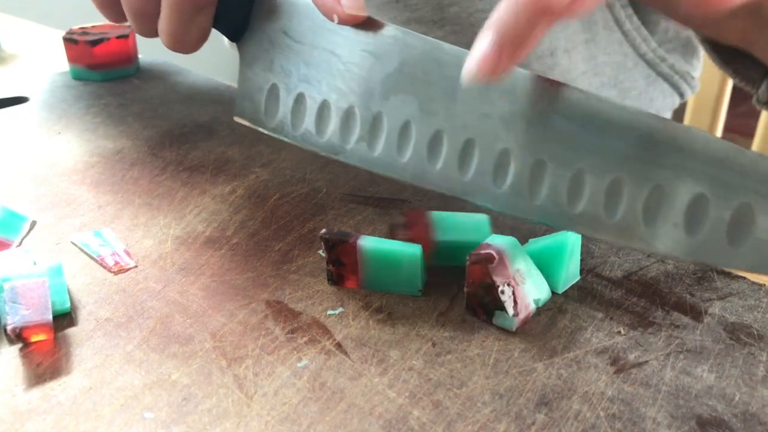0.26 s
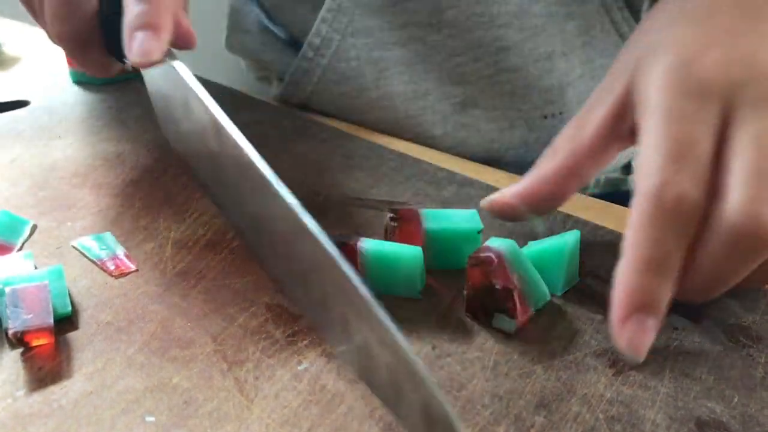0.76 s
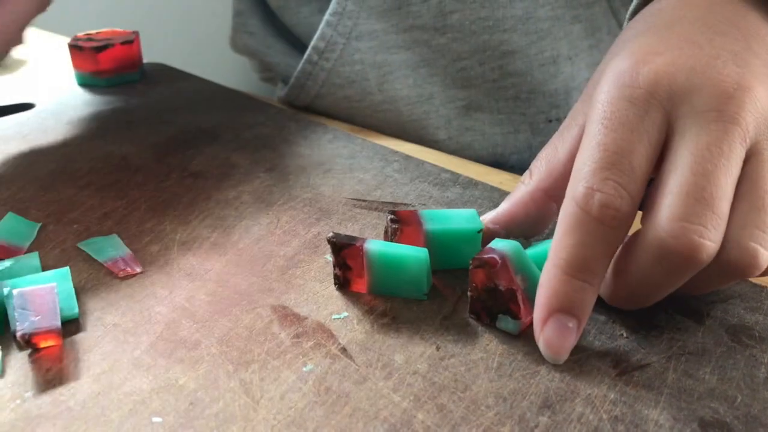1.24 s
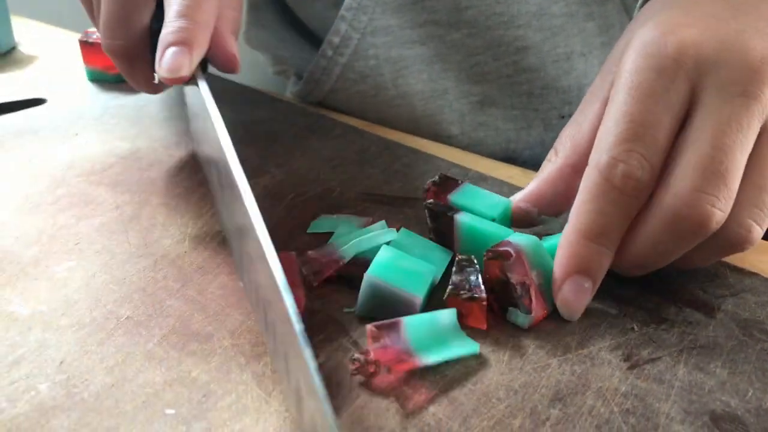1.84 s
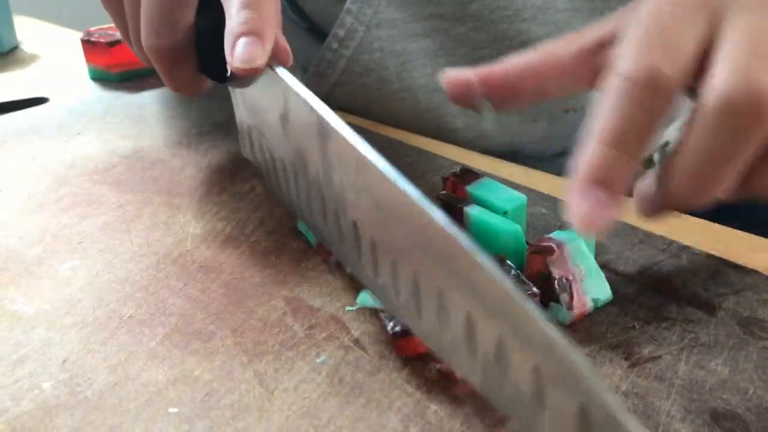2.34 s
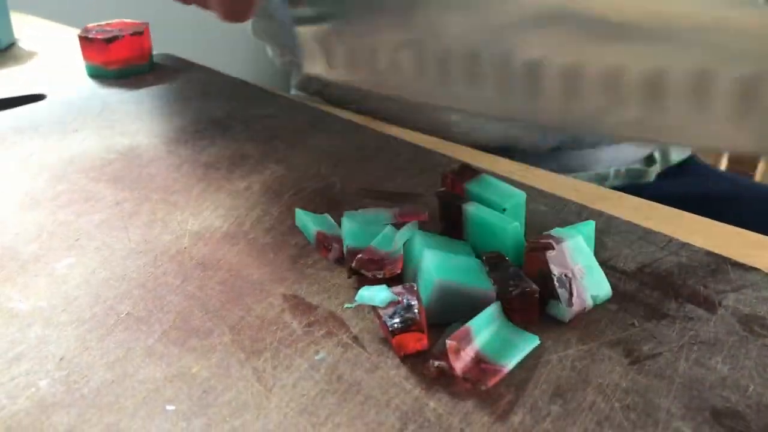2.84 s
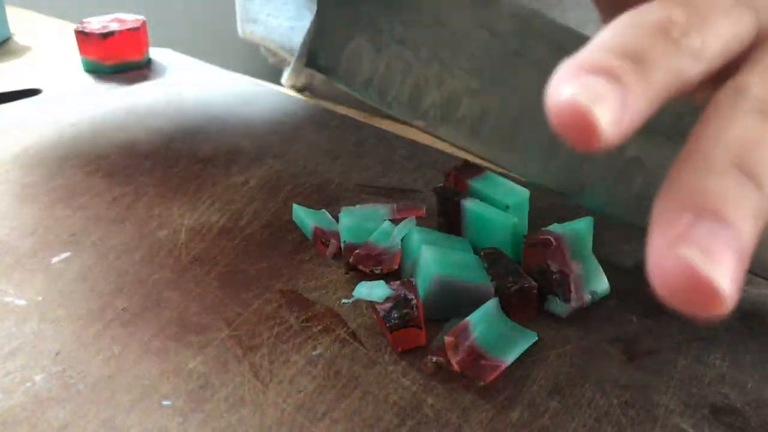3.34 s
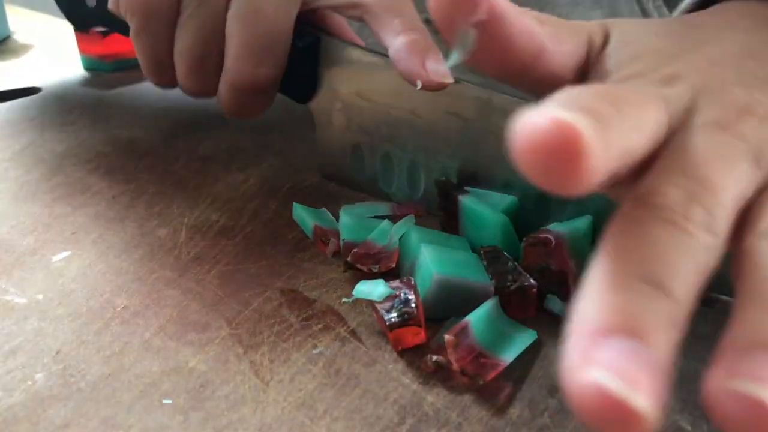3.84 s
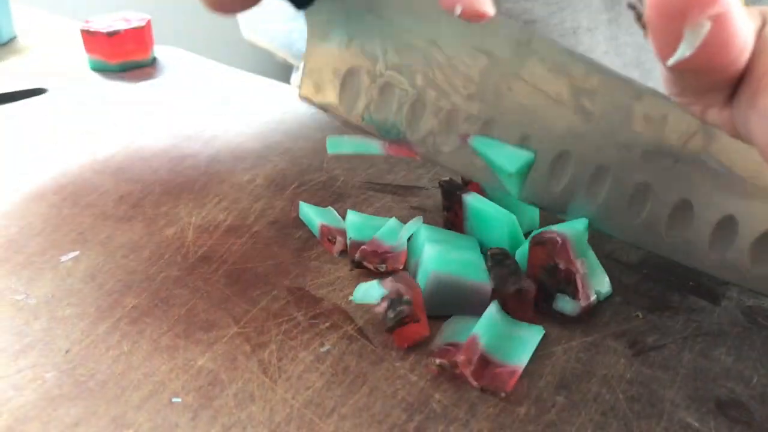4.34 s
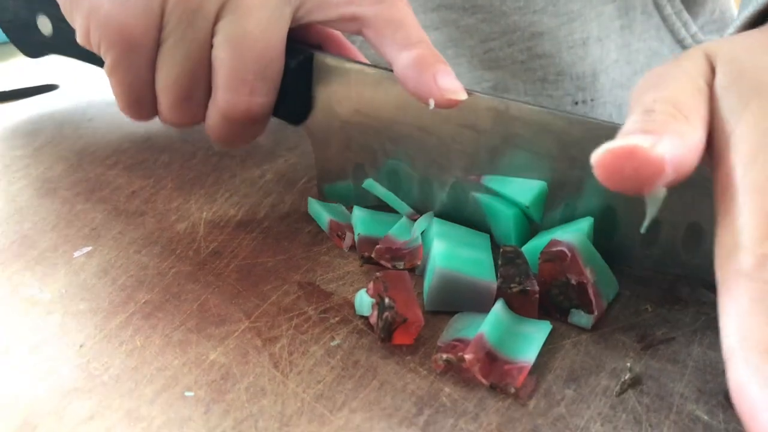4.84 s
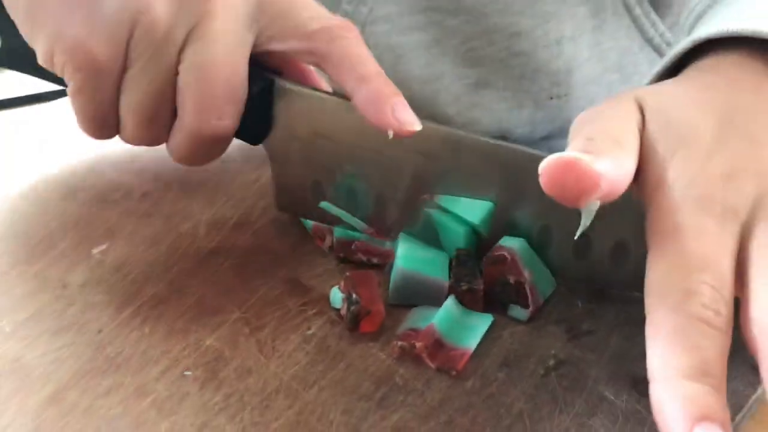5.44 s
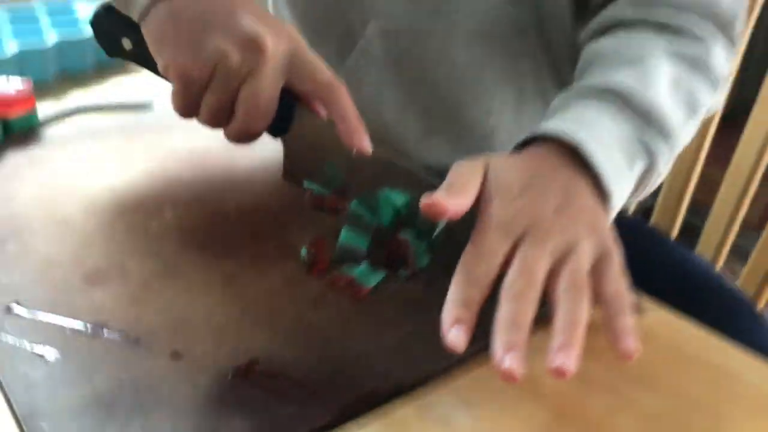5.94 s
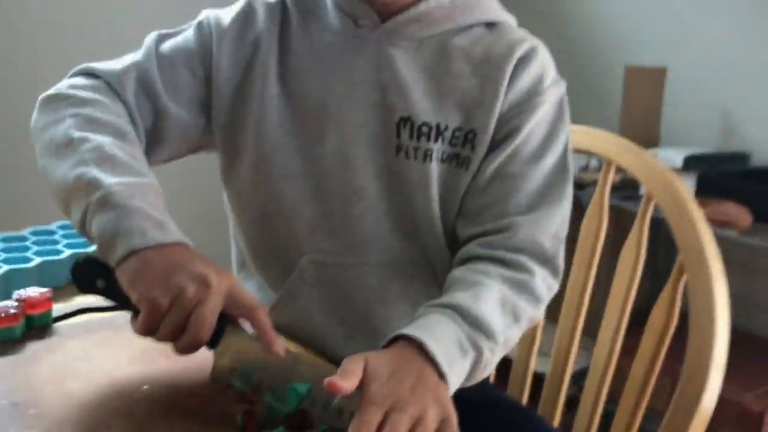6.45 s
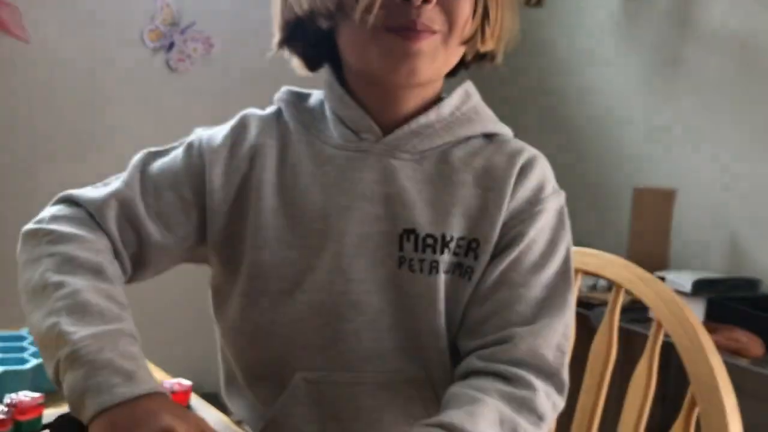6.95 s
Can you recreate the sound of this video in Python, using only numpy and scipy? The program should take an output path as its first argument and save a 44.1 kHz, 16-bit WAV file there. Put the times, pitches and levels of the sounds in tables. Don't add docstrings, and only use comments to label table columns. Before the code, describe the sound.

A large steel knife cracks irregularly onto a wooden board, scraping and ringing between blows as sticky soap snaps loose and sleeves rustle.

```python
import sys
import numpy as np
from scipy import signal
from scipy.fft import rfft, irfft
from scipy.io import wavfile

SR = 44100
rng = np.random.default_rng(int(sys.argv[2]) if len(sys.argv) > 2 else 0)


def to_wav(sig):
    pcm = np.clip(np.atleast_2d(sig), -1, 1) * 32767
    pcm = np.round(pcm).astype(np.int16)
    wavfile.write(sys.argv[1], SR, pcm.T)


def how_loud(loudness_db):
    steps = np.asarray(loudness_db, float) / 20
    return 10 ** steps


N = 316986


def rms_one(x):
    return x / np.sqrt(np.mean(x ** 2) + 1e-20)


def filtered(x, order, hz, kind="low"):
    return signal.sosfilt(signal.butter(order, hz, kind, fs=SR, output="sos"), x)


def at_hz(points, hz):
    at, *columns = np.transpose(points)
    return [np.interp(np.log(hz), np.log(at), column) for column in columns]


def colour(x, spectrum):
    hz = np.maximum(np.arange(N // 2 + 1) * SR / N, 1)
    return rms_one(irfft(rfft(x) * how_loud(at_hz(spectrum, hz)[0]), N))


def resonate(x, hz, width):
    r = np.exp(-np.pi * max(width, 3) / SR)
    poles = [1, -2 * r * np.cos(2 * np.pi * hz / SR), r * r]
    return signal.lfilter([1, 0, -1], poles, x) * (1 - r * r) / 2


def drift(rate):
    knots_per_s = 200
    knots = rng.standard_normal(int(N / SR * knots_per_s) + 2)
    slow = signal.sosfilt(signal.butter(2, min(rate, 90), fs=knots_per_s, output="sos"), knots)
    return np.interp(np.arange(N) / SR * knots_per_s, np.arange(len(slow)), rms_one(slow))


def grains(per_s, spread_db):
    sizes = how_loud(spread_db * np.minimum(rng.exponential(1, N), 3)) * rng.choice([-1, 1], N)
    return rms_one(sizes * (rng.random(N) < per_s / SR))


def swells(rows, weights=1):
    s, db, rise, fall = np.transpose(rows)[:4, :, None]
    at = np.arange(0, N + 32, 32)
    late = at / SR - s
    away = np.maximum(-late / np.maximum(rise, .002), late / np.maximum(fall, .002))
    gain = how_loud(db - 30 * (away + 4 * np.maximum(away - 1, 0)))
    return np.interp(np.arange(N), at, np.sum(gain * np.reshape(weights, (-1, 1)), axis=0))


def add(out, s, sound):
    at = round(s * SR)
    out[at:at + len(sound)] += sound[:N - at]


def background():
    # frequency in Hz, level in dB per Hz.
    hum_spectrum = [(15, -41), (25, -11), (206, 0), (263, -4), (326, -3), (463, -10), (516, -14),
                    (775, -13), (840, -18), (1290, -20), (1740, -25), (2760, -27), (7710, -34),
                    (12900, -33), (15850, -37), (16100, -60)]
    # frequency in Hz, width in Hz, level in dB.
    hum_peaks = [(200, 100, -75.5), (286, 90, -78.5), (750, 55, -88), (11300, 160, -93.5)]
    # frequency in Hz, level in dB.
    motor_tones = [(6342, -86.5), (12683, -78)]
    t, white = np.arange(N) / SR, rng.standard_normal((2, N))
    hum = how_loud(-65.5) * colour(white[0], hum_spectrum)
    peaks = sum(how_loud(db) * rms_one(resonate(white[1], hz, width)) for hz, width, db in hum_peaks)
    running = (t > 5.943) & (t < 6.44)
    whine = sum(how_loud(db) * np.sin(2 * np.pi * hz * t) for hz, db in motor_tones)
    return hum + peaks + running * whine


def handling():
    # peak time in seconds, level in dB, rise in seconds, fall in seconds.
    shifts = [(0.14, -76, .3, 0.81), (1.36, -78, .3, 1.0), (2.06, -63.5, .3, 0.7), (3.22, -75.5, .5, 1.45),
              (3.74, -70.5, .3, 1.1), (4.86, -56, .25, 0.31), (5.2, -68, 1.1, 0.7),
              (5.62, -52.5, 0.53, 0.28), (6.18, -70.5, .9, 1.2), (6.79, -55, 0.08, 0.44),
              (6.9, -58, 0.49, 0.049), (7.07, -51, 0.048, 0.21)]
    grip_db = -86.5
    rumble = filtered(rng.standard_normal(N), 2, [30, 85], "band")
    return (how_loud(grip_db) + swells(shifts)) * how_loud(0.83 * drift(3.9)) * rms_one(rumble)


def room(x):
    # frequency in Hz, level in dB, decay t60 in seconds.
    decays = [(60, -13, .55), (160, -3, .55), (420, -1, .42), (1100, 0, .42), (2900, -4, .4),
              (7700, -5, .34), (15000, -8, .2)]
    late_db, early_share, late_stretch = -11.5, .75, 1.45
    t = np.arange(round(.8 * SR)) / SR
    edges = 45 * 2 ** np.arange(0, 8.6, .5)
    white = rng.standard_normal((2, len(t)))
    echo = 0
    for k, (low, high) in enumerate(zip(edges, edges[1:])):
        db, t60 = at_hz(decays, np.sqrt(low * high))
        early = how_loud(-60 * t / (early_share * t60))
        late = how_loud(late_db - 60 * t / (late_stretch * t60))
        echo = echo + filtered(white[k % 2], 2, [low, high], "band") * how_loud(db) * (early + late)
    echo = echo * (1 - np.exp(-(t / .005) ** 2))
    return signal.fftconvolve(x, echo / np.sqrt(np.sum(echo ** 2)))[:N]


def rustle():
    # time of fastest motion in seconds, level in dB, rise in seconds, fall in seconds.
    motions = [(0.205, -68, .05, 0.2), (0.264, -66, 0.12, 0.18), (0.428, -68.5, 0.24, 0.16),
               (0.582, -69.5, 0.092, 0.34), (0.896, -81, 0.089, .035), (1.74, -76, 0.17, 0.15),
               (2.2, -70, 0.046, 0.041), (2.375, -76.5, 0.0096, 0.13), (2.63, -92, .1, 0.25),
               (2.726, -78, .24, 0.022), (3.3, -75, .05, 0.072), (3.542, -67.5, 0.035, .03),
               (3.71, -66, .03, 0.82), (3.968, -81.5, 0.17, 0.025), (4.125, -73, 0.15, 0.08),
               (4.236, -88, 0.18, 0.2), (4.692, -62, 0.054, 0.021), (5.0, -71.5, 0.16, 0.48),
               (5.246, -66.5, 0.029, 0.23), (5.42, -73, 0.072, 0.032), (5.91, -69, 0.57, 0.096),
               (5.966, -74, 0.057, 0.098), (6.109, -71, 0.15, 0.19), (6.16, -74, 0.044, 0.28),
               (6.424, -69.5, 0.048, 0.097), (6.46, -59.5, 0.01, 0.0085), (6.726, -72.5, 0.41, .01),
               (6.774, -52.5, 0.042, 0.165), (6.86, -71, 0.29, 0.89), (7.032, -53.5, 0.025, 0.3)]
    # frequency in Hz, level in dB per Hz.
    cloth = [(400, -18.5), (800, -4), (1300, 3.5), (2600, -3), (4200, -9.5), (6000, -25.5), (9000, -47.5)]
    sheen_db = -12 - 0.55 * (np.array(motions)[:, 1] + 70)
    fibres = grains(per_s=9900, spread_db=-1.0) * how_loud(1.5 * drift(59))
    sheen = filtered(fibres, 2, [4000, 11000], "band")
    return swells(motions) * colour(fibres, cloth) + swells(motions, how_loud(sheen_db)) * rms_one(sheen)


def brushes():
    # time of firmest touch in seconds, level in dB, rise in seconds, fall in seconds,
    # ringing share from 0 to 1.
    touches = [
        (2.47, -70.5, .004, 0.14, 0.9),
        (2.52, -72.5, .01, .1, .7),
        (2.565, -66.5, 0.064, 0.11, .95),
        (2.61, -74.5, .05, 0.199, .2),
        (3.14, -74.5, 0.046, 0.12, 1),
        (4.08, -74.5, 0.059, 0.47, 0.3),
        (4.233, -75, 0.47, 0.055, .1),
    ]
    # frequency in Hz, width in Hz, level in dB.
    free_blade = [(4480, 69, -11), (5630, 40, -8), (5850, 38, -12), (6510, 26, -4), (7460, 28, -7),
                  (8480, 31, 0), (8800, 130, -9), (9190, 35, -20), (9630, 94, -10), (11200, 140, -10),
                  (12900, 56, -13), (14000, 98, -16)]
    share = np.clip(np.array(touches)[:, 4], 0, 1)
    slips = grains(per_s=4000, spread_db=3)
    rings = 0
    for hz, width, db in free_blade:
        rings = rings + how_loud(db + 2.5 * drift(9)) * rms_one(resonate(slips, hz, .6 * width))
    hiss = filtered(slips, 2, [3000, 13000], "band")
    ringing = swells(touches, np.sqrt(share)) * rms_one(rings)
    return ringing + swells(touches, np.sqrt(1 - share)) * rms_one(hiss)


def squeaks():
    # start in seconds, end in seconds, level in dB.
    slides = [
        (1.18, 1.207, -71.5),
        (1.926, 1.941, -59.5),
    ]
    t = np.arange(N) / SR
    tone = rms_one(resonate(rng.standard_normal(N), 2980, 50))
    return tone * sum(how_loud(db) * np.interp(t, [s, end], [.3, 1], left=0, right=0) for s, end, db in slides)


def snaps():
    # time in seconds, peak level in dB, pitch in Hz.
    releases = [(0.7053, -51, 2900), (0.7822, -39.5, 2850), (1.519, -53, 6140), (1.5566, -45, 6210),
                (1.607, -29.5, 3750), (2.0955, -56, 8000), (2.468, -52.5, 8430), (3.5405, -54.5, 6500),
                (3.561, -55.5, 8000), (3.5785, -40, 6060), (3.735, -57, 7600), (3.8742, -57.5, 7500),
                (5.2484, -50, 2906), (5.4392, -53, 8000), (5.449, -49, 3600), (5.6349, -42, 7800),
                (6.1474, -56.5, 3320), (6.2053, -52, 8500), (6.7605, -46, 4500), (7.0998, -20, 3600),
                (7.1073, -16, 2300), (7.1132, -25, 3192)]
    out, t = np.zeros(N), np.arange(400) / SR
    for s, db, hz in releases:
        noise = rng.standard_normal(400) * how_loud(-60 * t / .006)
        burst = resonate(noise, hz, min(1.4 * hz, 4500))
        add(out, s - .0003, how_loud(db) * burst / np.abs(burst).max())
    return out


def blade_rings(slips):
    # frequency in Hz, width in Hz, level in dB.
    held = [(775, 36, -2), (1070, 46, -6), (1540, 89, -8), (1960, 39, -6), (2630, 34, 0), (2940, 59, -3),
            (3520, 44, -8), (3730, 200, -6), (4460, 85, -9), (5580, 81, -9), (6170, 65, -10),
            (6520, 33, -5), (6800, 37, -11), (7560, 120, -14), (8090, 55, -9), (8580, 54, -10),
            (9200, 97, -4), (9750, 27, -10), (10400, 48, -8), (11200, 24, -12), (11500, 40, -3),
            (12700, 50, -2), (12900, 32, -2), (14000, 74, -13), (14300, 100, -18), (15100, 83, -16)]
    rocked = [(4150, 160, -4), (5700, 83, -5), (7460, 84, -11), (8490, 47, -5), (9240, 32, -3),
              (9620, 110, -2), (10000, 82, -8), (10200, 25, -10), (11500, 130, 0), (12500, 87, -7),
              (12900, 120, -7), (14000, 110, -3), (14200, 26, -7), (15400, 83, -12)]
    dragged = [(1950, 120, 0), (3560, 110, -5), (4710, 73, -8), (5570, 46, -6), (6150, 49, -3),
               (6790, 190, -1), (7910, 38, -5), (8610, 43, -5), (9100, 290, -7), (11500, 54, -9),
               (12700, 280, -8), (13900, 130, -11), (14300, 40, -12), (15500, 190, -12)]
    swept = [(635, 42, -2), (1960, 37, 0), (2610, 110, -4), (2910, 22, -4), (4120, 81, -2), (4370, 64, -4),
             (4540, 28, -3), (6230, 300, -7), (6510, 170, -7), (6750, 34, -8), (7280, 37, -8),
             (8420, 140, -10), (9940, 41, -14), (11200, 53, -11)]
    # start in seconds, end in seconds, low ringing in dB, high ringing in dB.
    holds = [
        (0, 1.19, 13, -5.5),
        (1.19, 1.375, -3, 2),
        (1.375, 1.8, -4.5, -3.5),
        (1.8, 3.0, -6.5, 1.5),
        (3.0, 6.9, -8.5, -5),
        (6.9, 7.2, -3.5, -3.5),
    ]
    sets = [dragged, held, dragged, rocked, dragged, swept]
    out, t = np.zeros((2, N)), np.arange(N) / SR
    for (s, end, low_db, high_db), modes in zip(holds, sets):
        a, b = round(max(s - .01, 0) * SR), min(round((end + .04) * SR), N)
        fade = np.interp(t[a:b], [s - .01, s + .01, end - .01, end + .01], [0, 1, 1, 0])
        drive = slips[a:b] * fade
        rings = np.zeros((2, b - a)) + 1e-9
        for hz, width, db in modes:
            flare = how_loud(.8 * db + 2.5 * drift(14)[a:b])
            rings[int(hz > 6000)] += flare * rms_one(resonate(drive, hz, width))
        out[:, a:b] += [how_loud(low_db) * rms_one(rings[0]), how_loud(high_db) * rms_one(rings[1])]
    return out


def scrapes():
    # time of full pressure in seconds, level in dB, rise in seconds, fall in seconds,
    # middle part in dB re bright.
    strokes = [(0.052, -56, 0.026, 0.08, -31), (0.875, -63, 0.03, 0.092, 5.5),
               (0.9, -64.5, 0.08, 0.025, 4.5), (1.285, -35, .08, .2, 1.5), (1.32, -38, .1, .1, -1.5),
               (1.362, -36.5, 0.1, 0.04, 1), (1.4, -42.5, .08, 0.26, 3), (1.5, -54, .1, .2, 2.5),
               (1.614, -50.5, .25, 0.046, 3.5), (1.954, -52.5, .011, 0.098, -12),
               (1.985, -54, 0.053, 0.087, -15.5), (2.02, -58, .06, .015, -12), (2.1, -68, .005, .1, -4),
               (2.151, -57.5, 0.077, 0.012, 4), (2.168, -58.5, 0.025, .025, 5),
               (3.58, -54, 0.006, 0.0092, 6.5), (3.588, -54.5, 0.006, 0.025, 5),
               (3.669, -49, 0.0076, 0.02, -1), (3.678, -43, 0.035, 0.0041, 6.5),
               (4.41, -75, 0.096, .1, 4.5), (4.441, -62, 0.005, 0.055, 4), (4.45, -64, .02, .012, 4.5),
               (4.465, -63.5, .015, .04, 5), (4.486, -66, 0.065, .01, 4), (5.501, -68, 0.0073, 0.004, 18.5),
               (5.58, -70, .15, 0.072, 8), (6.464, -71, 0.014, 0.11, 17), (6.53, -68, 0.085, .17, 10),
               (7.082, -60, .004, .05, 9), (7.089, -50, .004, .06, 6), (7.101, -40, .004, .1, 10.5),
               (7.108, -41, 0.0087, 0.18, 5.5), (7.145, -46.5, .1, 0.09, 2), (7.188, -47, 0.042, .05, 8)]
    # frequency in Hz, level in dB per Hz.
    body_spectrum = [(88, -39.5), (150, -4), (627, -11), (773, -4), (908, -15), (1070, -9.5), (1250, -3),
                     (2670, -14), (7000, -22), (9100, -50), (15400, -120)]
    bright_spectrum = [(2940, -23), (5000, -15), (6380, -1), (7200, -7), (9410, -2.5), (12100, -4.5),
                       (15700, -9), (16100, -50)]
    middle_db = np.array(strokes)[:, 4]
    wood_db = .6 * np.minimum(middle_db, 0)
    pressure = swells(strokes)
    pressed = np.clip(pressure / how_loud(-33), 0, 1) ** 1.2
    slips = grains(per_s=6000, spread_db=3.5) * how_loud(1.5 * drift(70))
    low, high = blade_rings(slips)
    bright = colour(slips, bright_spectrum) + high
    bright = signal.sosfilt(signal.cheby2(12, 40, 16300, fs=SR, output="sos"), bright)
    body = colour(slips, body_spectrum) + pressed * low
    wood = swells(strokes, how_loud(wood_db)) * rms_one(filtered(body, 4, 1700))
    middle = swells(strokes, how_loud(middle_db)) * rms_one(filtered(body, 6, 1850, "high"))
    return how_loud(-6.5) * (pressure * bright + middle + wood)


def struck(modes, gain_db, detune, t):
    hz, db, t60 = np.transpose(modes)[:, :, None]
    alternating = (-1) ** np.arange(len(modes))[:, None]
    signs = np.where(hz > 400, alternating, np.sign(detune[:, None] - 1))
    wave = np.sin(2 * np.pi * hz * detune[:, None] * t)
    return np.sum(signs * how_loud(db + gain_db[:, None] - 60 * t / t60) * wave, axis=0)


def bend(x, lag_s):
    khz = np.arange(len(x) // 2 + 1) * SR / len(x) / 1000
    return irfft(rfft(x) * np.exp(-4000j * np.pi * lag_s * np.sqrt(khz)), len(x))


def blows():
    # time in seconds, peak level in dB, hardness in dB,
    # steel tick in dB, table thump in dB.
    chops = [
        (1.201, -13, -6.5, -19.5, -12),
        (1.9406, -8, -4.5, -24, -18),
        (3.218, -29.5, -24, -20.5, -6),
        (3.655, -23.5, -12.5, -20.5, -17.5),
        (4.699, -7.5, -6.5, -12, -15.5),
        (5.643, -25, -18, -8, -2),
        (6.7363, -24.5, -10, -55, -4),
        (7.02, -21.5, -7, -53, -23),
    ]
    # time in seconds, peak level in dB,
    # hardness in dB, table thump in dB.
    light_taps = [(0.067, -40.5, -13, -9), (0.088, -58, -8.5, 6.5), (0.264, -43.5, -22, -16),
                  (0.29, -49, -30, -0.5), (0.953, -51, -25, -36), (1.713, -57.5, -11, -4),
                  (1.795, -55.5, -15, 0), (1.918, -54.5, -8, 1), (2.094, -38, -36, -2),
                  (2.281, -54.5, -14.5, -33), (2.342, -55, -32, -6.5), (2.369, -46.5, -12.5, -27),
                  (3.296, -53, -9.5, -1), (3.562, -44.5, -18, 5), (3.965, -48, -23, -5),
                  (4.438, -48, -9, -4.5), (4.448, -50.5, -10, -8), (4.463, -49, -10.5, -4),
                  (4.855, -47, -16, -14), (5.422, -50.5, -13.5, -4.5), (5.449, -48.5, -11.5, -16),
                  (5.496, -46.5, -7, 2), (5.521, -46, -10, -2), (5.874, -51.5, -19, -15),
                  (5.901, -44.5, -18, -20.5), (6.012, -55.5, -23, 3), (6.129, -39.5, -22, -10.5),
                  (6.2, -51.5, -23, -7), (6.459, -49.5, -10.5, 0), (6.518, -46, -7, -3),
                  (7.033, -32.5, -23, -24)]
    # frequency in Hz, level in dB, decay t60 in seconds.
    board = [(352, -6, .05), (399.2, -6.5, 0.03), (481, -1, 0.026), (651, -3.5, 0.045), (788, -2.5, .03),
             (889, -3, 0.039), (1076, -0.5, .03), (1343, 0.5, 0.011), (1680, -.5, 0.015),
             (1760, -7.5, 0.016), (2230, -4.5, .014)]
    table = [(52, -9, .2), (66, -5, .18), (82, -4, .15), (101, -3, .15), (124, -2, .16), (152, -4, .14),
             (191, -1, .18), (225, -4, .12), (252, -3, .12), (294, -3, .11), (373, -2, .1)]
    slap_hz, slap_db, slap_t60_s, slap_late_s = 550, -3.5, .014, .0014
    chatter_db, chatter_t60_s = -17.5, .02
    underside, underside_s = 0.62, 0.00076

    near, far, t = np.zeros(N), np.zeros(N), np.arange(16384) / SR
    short, brief = t[:8192], t[:1000]
    taps = [(s, db, hard, -13.5 + 0.77 * hard, thump) for s, db, hard, thump in light_taps]
    count, pulse = len(board), 1. * (short == 0)
    board_hz = np.array(board)[:, 0]
    upper = np.clip(np.log2(board_hz / 660) / 1.1, 0, 1.5)
    crack = filtered(pulse, 1, [1250, 3500], "band")
    steel_hz = [4000, 10500]
    for s, db, hard_db, tick_db, thump_db in sorted(chops + taps):
        level, pitch = rng.standard_normal((2, count + len(table)))
        noise = rng.standard_normal(1000)
        level_db, detune = 1.5 * level, 1 + .03 * pitch
        room_db = -3.5 + 0.08 * db

        soft_top_hz = 6500 * how_loud(0.67 * hard_db)
        cushion_db = -10 * np.log10(1 + (board_hz / soft_top_hz) ** 4)
        wood_db = level_db[:count] + cushion_db + (.5 * hard_db + 3.5) * upper
        wood = struck(board, wood_db, detune[:count], short)

        top_hz = np.clip(5200 + 65 * (tick_db + 20.5), 2000, 9000)
        edge = crack + underside * np.roll(crack, round(underside_s * detune[0] ** 4 * SR))
        crack_gain = how_loud(1.29 * hard_db + 37.0)
        knock = bend(filtered(wood + crack_gain * edge, 3, top_hz), lag_s=.0008)
        spread = bend(filtered(wood + crack_gain * crack, 3, top_hz), lag_s=.0008)
        scale = how_loud(db) / np.abs(knock).max()

        tick = how_loud(db + tick_db + 6.0) * filtered(noise * how_loud(-60 * brief / 0.0062), 2, steel_hz, "band")
        far_tick = how_loud(room_db + db + tick_db + 7.5) * filtered(pulse[:200], 2, steel_hz, "band")
        thump = struck(table, level_db[count:], detune[count:], t) * (1 - np.exp(-(t / .002) ** 2))
        slap = np.sin(2 * np.pi * slap_hz * detune[1] * t[:2000])
        slap = slap * how_loud(db + slap_db - 60 * t[:2000] / slap_t60_s)
        settling = noise * how_loud(db + chatter_db + hard_db - 60 * brief / chatter_t60_s)

        add(near, s + .001, scale * knock)
        add(near, s + .001 + slap_late_s, slap)
        add(near, s + .002, filtered(settling, 2, [2500, 5500], "band"))
        add(near, s + .0012, tick)
        add(near, s, how_loud(db + thump_db - 8.5) * thump)
        add(far, s, how_loud(room_db) * scale * spread)
        add(far, s + slap_late_s, how_loud(room_db - 3) * slap)
        add(far, s + .006, far_tick)
        add(far, s, how_loud(db + thump_db - 5) * thump)
    return near, far


def scene():
    near, far = blows()
    small = snaps() + squeaks() + scrapes() + brushes()
    echo = room(how_loud(-8.0) * far + how_loud(-13) * small)
    return (near + small + echo + rustle() + handling() + background())[None]


def top_cut(x):
    return signal.sosfilt(signal.butter(12, 16550, fs=SR, output="sos"), x)


def record(dry):
    miked = filtered(dry, 3, 45, "high")
    miked = signal.sosfilt(signal.cheby2(16, 60, 16900, fs=SR, output="sos"), miked)
    return top_cut(miked)


dry = scene()
out = record(dry)
to_wav(out)
```